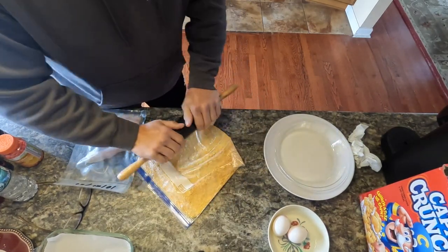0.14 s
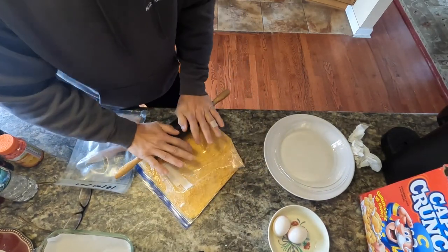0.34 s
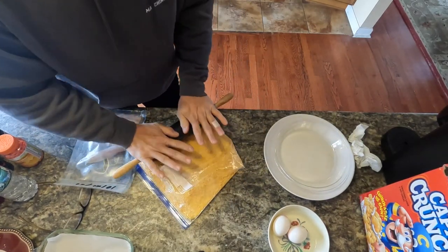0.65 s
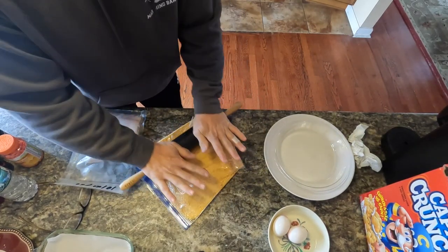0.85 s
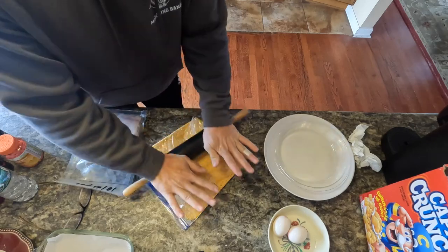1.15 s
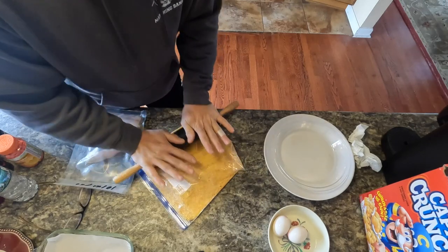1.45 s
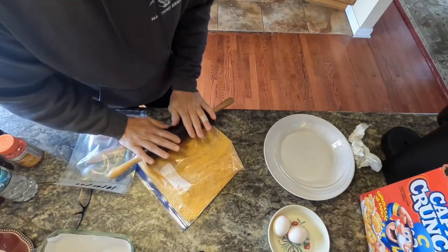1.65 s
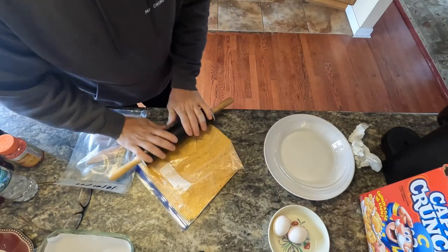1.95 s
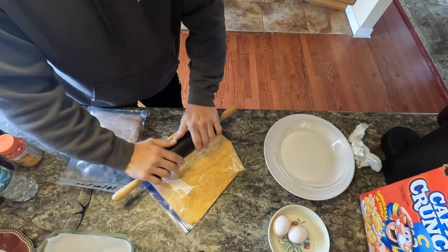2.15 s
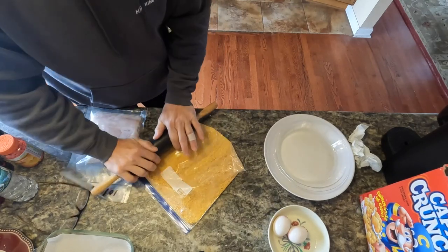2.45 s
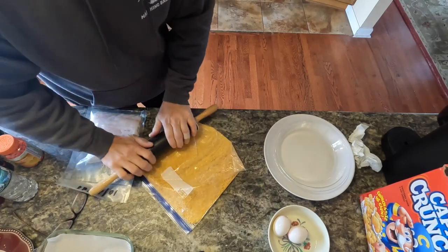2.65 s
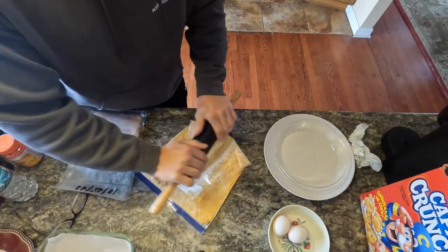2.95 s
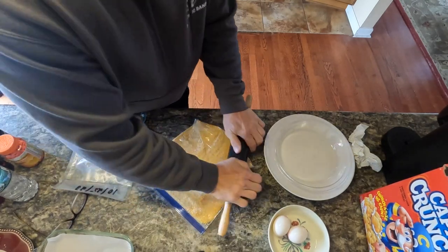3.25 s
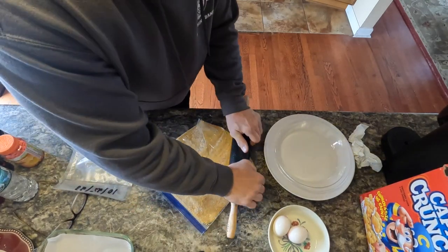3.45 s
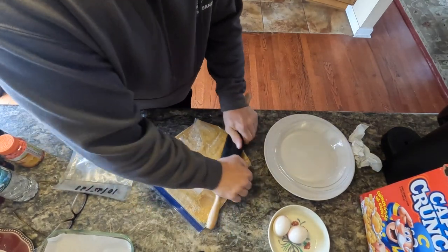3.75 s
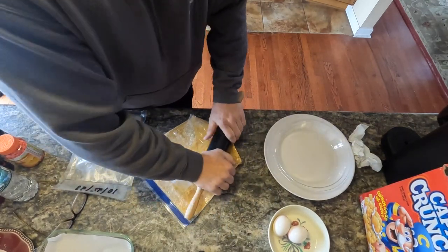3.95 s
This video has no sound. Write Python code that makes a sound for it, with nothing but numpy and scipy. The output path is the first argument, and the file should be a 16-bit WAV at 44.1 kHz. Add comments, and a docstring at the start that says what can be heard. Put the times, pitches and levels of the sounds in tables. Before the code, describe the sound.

In a quiet kitchen, a wooden rolling pin lands with a crunching thud on a plastic bag of dry cereal, then grinds it in quick short shoves. Crumbs crack, the stone counter rumbles and the bag faintly crinkles. After a lull the pin clacks down again, rolls briefly, then knocks down hardest and makes a few duller, softer rolls. Close microphone, slight room reflections.

```python
"""A rolling pin is pushed in short shoves over a plastic bag of cereal on a stone kitchen counter.
Each shove swells noise-like trains of fractures, bumps and folds: crumbs crack, counter rumbles, bag crinkles.
Three times it is set down: a swell of fractures with pin ring and boom, plus thuds and clacks of struck modes.
Light bag crackles and one axle creak are short bursts of filtered grains.
Beneath lie the cabinet's shudder and the low hush of the kitchen, both coloured noise."""
import sys
import numpy as np
from scipy import signal
from scipy.fft import rfft, irfft
from scipy.io import wavfile
from scipy.ndimage import uniform_filter1d

SR = 44100
rng = np.random.default_rng(int(sys.argv[2]) if len(sys.argv) > 2 else 0)


def int16_out(signal):
    """Quantize to a 16-bit WAV file."""
    q = np.round(np.clip(np.atleast_2d(signal).T, -1, 1) * 32767)
    wavfile.write(sys.argv[1], SR, q.astype(np.int16))


N = 180369
TIME = np.arange(N) / SR

# forward shoves of the hands, levels before the mix:
# [full pressure t/s, hold/s, crumbs level/dB, rumble level/dB, bag level/dB]
SHOVES = [(0.0, 0.071, -46.5, -41.5, -63.5), (0.493, 0.077, -25.5, -20.5, -45),
          (0.663, 0.046, -28.5, -26.0, -48.5), (0.826, 0.038, -24, -24.5, -43.5),
          (0.978, 0.051, -28, -24.0, -46.5), (1.151, 0.067, -25.0, -23.5, -45),
          (1.332, 0.08, -27.5, -27.5, -47.0), (1.55, 0.028, -27.5, -24.5, -46),
          (1.679, 0.028, -28, -27.5, -48.0), (1.829, 0.0093, -29, -26, -44),
          (1.96, 0.042, -33.5, -32.0, -51.5), (2.106, 0.047, -33.0, -31, -48),
          (2.53, 0.075, -27.5, -27.5, -45), (2.701, 0.0057, -30.5, -29.0, -47.5),
          (2.813, 0.024, -31, -32, -44.5), (3.297, 0.058, -27.5, -24.5, -52),
          (3.426, 0.026, -43, -31.5, -51), (3.561, 0.11, -36, -28, -54), (3.778, 0.0044, -37.5, -28, -51.5),
          (3.904, 0.0058, -34, -26.5, -53.5), (4.03, 0.049, -50.0, -40, -68.0)]
PRESS_S, RELEASE_T60_S = 0.081, 0.41
RUMBLE_EXPONENT, BAG_EXPONENT = 1.49, 1.13   # powers of the pressure


def shove_gains():
    """Crumb, rumble and bag gains follow hand pressure; overlapping shoves add in power."""
    power = np.zeros((3, N))
    for s, hold_s, crumbs_db, rumble_db, bag_db in SHOVES:
        pressure = stroke(s, hold_s, PRESS_S, RELEASE_T60_S)
        crush = from_db(crumbs_db) * pressure
        jolt = from_db(rumble_db) * pressure ** RUMBLE_EXPONENT
        crease = from_db(bag_db) * pressure ** BAG_EXPONENT
        power += np.square([crush, jolt, crease])
    return np.sqrt(power)


# crumb spectra on the heap and at its thin edge: [f/Hz, relative level/dB]
HEAP_CRUMBS = [(150, -30.5), (290, 6), (395, -18), (540, 2), (760, -2.5), (950, -4), (1100, 1),
               (1600, -1.5), (2000, -3), (2900, -5), (4200, -15), (6000, -21), (8000, -60), (16000, -54)]
EDGE_CRUMBS = [(150, -12.5), (320, 10), (420, 4.5), (620, 4), (750, 8.5), (960, -2.5), (1220, 5.5),
               (1750, 0.5), (2900, -3.5), (4200, -11), (6000, -17), (8000, -42), (16000, -61)]
# counter rumble spectra, heap and edge: [f/Hz, relative level/dB]
HEAP_RUMBLE = [(45, -42), (82, -8), (100, -22), (116, -9), (138, 0.5), (166, 4), (190, -8.5), (222, -3),
               (256, -1.5), (320, -27), (600, -30.5), (2000, -68)]
EDGE_RUMBLE = [(45, -40), (85, -21), (125, -10.5), (160, 7), (190, -6.5), (218, 1), (255, -4.5), (310, -21),
               (600, -41), (2000, -85)]
# bag crinkle spectrum: [f/Hz, relative level/dB]
BAG = [(1000, -27.5), (3000, 16.5), (5500, 9.5), (8200, 7.5), (9500, 2), (10900, -3), (11800, 2.5),
       (13200, -2.5), (14500, -9), (16000, -22)]
# higher modes of the stone slab, also rung by the landings: [f/Hz, relative level/dB, t60/s]
SLAB = [(367.8, 1.5, 0.1), (433.2, 0.5, 0.17), (464.5, 5.5, 0.11), (509.3, -5, 0.18), (594.3, -2, 0.19),
        (691, -11, 0.47), (863, 0.5, 0.097), (1249, -9, 0.32), (1410, 5, 0.026)]
TURN_S = 3.1   # pin swung round to the thin edge of the heap


def rolling(crush, jolt, crease, echo):
    """Harder pushes crack more crumbs; the pin jolts over them into the counter and creases the bag."""
    turned = TIME > TURN_S
    fractures = grains(1500 + 5000 * np.sqrt(crush / crush.max()), spread_db=2.0)
    bumps = grains(900, spread_db=2.0)[0]

    slab = steady(ring(grains(2500, spread_db=4.5)[0], SLAB), span_s=0.075)
    on_heap = steady(colour(fractures, HEAP_CRUMBS), span_s=0.33) + from_db(-1) * slab
    on_edge = from_db(1.5) * steady(colour(fractures, EDGE_CRUMBS), span_s=0.037)
    crumbs = crush * np.where(turned, on_edge, on_heap)

    counter = np.where(turned, colour(bumps, EDGE_RUMBLE), colour(bumps, HEAP_RUMBLE))
    rumble = jolt * steady(counter, span_s=0.26)

    # slack plastic at the edge rustles duller than taut plastic over the heap
    folds = grains(7000, spread_db=-0.5)
    slack = colour(folds, BAG, tilt_db=-1.5)
    taut = colour(folds, BAG, tilt_db=-0.14)
    bag = crease * steady(np.where(turned, slack, taut), span_s=0.07)

    airborne = from_db(-4.0) * crumbs + from_db(4.0) * bag
    return in_room(airborne, echo, wet_db=-16.5) + from_db(-2.5) * rumble


# pin sinking into the heap; ring level is relative to the crunch, tilt acts above 1 kHz:
# [peak pressure t/s, crunch level/dB, rise/s, t60/s, tilt/(dB/octave), pin ring level/dB,
#  barrel click level/dB, boom level/dB, boom f/Hz]
LANDINGS = [(0.341, -17, 0.0076, 0.22, -1.5, -32, -50, -14.5, 44.8),
            (0.366, -15.5, 0.0014, 0.2, -5, -43, -60, -16.5, 100.5),
            (2.456, -25, 0.0087, 0.17, 1.5, -23, -29, -20, 54),
            (2.472, -23, 0.0077, 0.21, -3, -8.5, -23.5, -16, 100),
            (3.218, -16, 0.0079, 0.21, -5, -10.5, -32, -24, 39.6),
            (3.289, -30, 0.011, 0.81, -18, -15, -46, -24.5, 138)]
# spectrum of fractures in the heap: [f/Hz, relative level/dB]
HEAP = [(20, -16), (42, -26), (80, 3), (150, 1.5), (290, 5), (450, -1.5), (780, -8), (1400, -6.5),
        (2700, -1), (4300, -8.5), (6000, -10.5), (8000, -21.5), (12000, -27.5), (16000, -46)]
# higher modes of the pin: [f/Hz, relative level/dB, t60/s]
PIN = [(1120, -7, 0.085), (2160, -6, 0.087), (3150, 7, 0.12), (3030, 0, 0.065), (3500, -34, .09),
       (4000, 13, 0.038), (4140, 12, 0.046), (4400, -23, 0.032), (4880, -10, 0.14)]
# main ring of the barrel: [f/Hz, relative level/dB, t60/s]
BARREL = [(2214, 6.5, 0.16)]
RING_LAG_S, BOOM_RISE_S, BOOM_T60_S = 0.0063, 0.0043, 0.35


def landings(echo):
    """A swell of fractures as the pin flattens the heap; pin and slab ring, the cabinet booms."""
    crunch, barrel, boom = 0, 0, 0
    singing = steady(ring(grains(2000, spread_db=0.0)[0], PIN), span_s=0.02)
    slab = from_db(-8.5) * steady(ring(grains(2000, spread_db=10.5)[0], SLAB), span_s=0.18)
    for s, db, rise_s, t60_s, tilt_db, ring_db, barrel_db, boom_db, boom_hz in LANDINGS:
        fractures = steady(colour(grains(7000, spread_db=1.0), HEAP, tilt_db), span_s=0.033)
        ringing = slab + from_db(ring_db) * singing
        cracking = swell(s, rise_s, t60_s) * fractures
        late_ring = swell(s + RING_LAG_S, rise_s, t60_s) * ringing
        crunch = crunch + from_db(db) * (cracking + late_ring)
        barrel = barrel + ring(blows([s], [barrel_db]), BARREL)
        tone = np.sin(2 * np.pi * boom_hz * (TIME - s))
        boom = boom + from_db(boom_db) * swell(s, BOOM_RISE_S, BOOM_T60_S) * tone
    return in_room(crunch, echo, wet_db=-8.5) + barrel + boom


def clack(s, db, hz, cycles):
    """A hard contact rings one mode that falls 60 dB in a few cycles."""
    return ring(blows([s], [db]), [(hz, 0, cycles / hz)])


# pin meeting the counter, levels of the exciting clicks:
# [t/s, thud level/dB, clack level/dB, clack f/Hz]
KNOCKS = [(0.3428, -8, -17, 2600), (0.3573, -22, -8.5, 776), (0.388, -19, -9.5, 590),
          (0.416, -18, -65, 413), (1.136, -24.5, -30, 400), (1.346, -23.5, -28, 440),
          (1.559, -22, -27, 333), (2.4552, -11.5, -8.5, 1270), (2.464, -15, -6, 1800),
          (2.4698, -12, -15, 506), (2.512, -22, -15, 440), (2.686, -27, -40, 420), (2.777, -31, -44, 453),
          (3.2191, -8.5, 0, 1075), (3.2238, -12.5, -7, 645), (3.236, -14.5, -15, 850),
          (3.266, -11.5, -19, 824), (3.295, -19, -12, 566), (3.312, -26, -25, 1090), (3.576, -30, -29, 286),
          (3.659, -29.5, -28, 266), (3.888, -30, -25.5, 330)]
# low modes of the counter on its cabinet: [f/Hz, relative level/dB, t60/s]
COUNTER = [(155, -3.5, 0.16), (160.6, -4.5, 0.15), (217.4, -8, 0.12), (258, -28, 0.13)]


def knocks(echo):
    """Each blow thuds in the counter modes and clacks at the contact."""
    s, thud_db, _, _ = np.transpose(KNOCKS)
    modes = ring(blows(s, thud_db), COUNTER)
    # the counter radiates little below its lowest mode
    thuds = filtered(modes, 2, 95, "high")
    clacks = sum(clack(at, db, hz, cycles=13.1) for at, _, db, hz in KNOCKS)
    return thuds + in_room(clacks, echo, wet_db=-4.5)


# light crackles of the bag: [t/s, level/dB, f/Hz, t60/s]
TICKS = [(0.3015, -34.5, 1800, 0.03), (0.3, -41.5, 4100, 0.11), (2.3075, -44.5, 2380, 0.021),
         (2.428, -40, 1200, 0.06), (2.439, -35, 1160, 0.095), (3.104, -43, 2700, 0.027),
         (3.103, -62, 7000, 0.08), (3.153, -54, 3300, 0.06), (3.191, -39, 1200, 0.089)]


def bag_ticks(echo):
    """Creasing plastic: short bursts of grains, each through one damped resonance."""
    creases = filtered(grains(5000, spread_db=3.0)[0], 2, 6500)
    ticks = 0
    for s, db, hz, t60_s in TICKS:
        crackle = steady(ring(creases, [(hz, 0, 7.3 / hz)]), span_s=0.0066)
        ticks = ticks + from_db(db) * swell(s, 0.00082, t60_s) * crackle
    return in_room(ticks, echo, wet_db=-1.5)


# axle resonances: [f/Hz, relative level/dB, t60/s]
AXLE = [(1040, -15, 0.043), (1570, 2, 0.032), (1720, -6, 0.022), (2030, -2, 0.028), (2270, 6.5, 0.036),
        (3680, -9, .025), (4140, -11, .04)]
CREAK_AT_S, CREAK_HOLD_S, CREAK_DB = 0.2465, 0.046, -47
CREAK_ATTACK_S, CREAK_T60_S = 0.011, 0.065


def axle_creak():
    """The lifted pin spins; fine slips ring the axle resonances."""
    slips = filtered(grains(2500, spread_db=2.5)[0], 2, 3200)
    envelope = stroke(CREAK_AT_S, CREAK_HOLD_S, CREAK_ATTACK_S, CREAK_T60_S)
    return from_db(CREAK_DB) * envelope * steady(ring(slips, AXLE), span_s=0.012)


# spectrum of the cabinet's shudder: [f/Hz, relative level/dB]
CABINET = [(10, -37), (22, 4), (42, 3), (60, 1), (75, -24), (110, -29), (300, -64)]


def cabinet(jolt):
    """The cabinet shudders beneath the leaning weight, only loosely following each push."""
    shudder = steady(colour(rng.standard_normal(N), CABINET), span_s=0.13)
    return from_db(-42.5) * (jolt / jolt.max()) ** 0.28 * shudder


# spectrum of the kitchen hush: [f/Hz, relative level/dB]
HUSH = [(20, -58), (45, 1.5), (65, 11), (90, -15.5), (140, 1.5), (210, -9.5), (270, -8), (400, -17),
        (700, -72), (2000, -32), (5000, -38), (10000, -59), (16000, -84)]
HUSH_RMS_DB = -49


def kitchen_hush():
    """Steady coloured noise at a fixed RMS level."""
    return from_db(HUSH_RMS_DB) * rms_one(colour(rng.standard_normal(N), HUSH))


# kitchen decay: [f/Hz, t60/s]
KITCHEN = [(250, 0.44), (1000, 0.54), (4000, 0.36), (9000, 0.49), (16000, 0.3)]


def kitchen_echo():
    """Diffuse reflections: noise bands with frequency-dependent decay; unit energy."""
    t = TIME[:SR // 2]
    edges_hz = np.geomspace(220, 16000, 8)
    tail = 0
    for low, high in zip(edges_hz, edges_hz[1:]):
        sos = signal.butter(2, [low, high], "band", fs=SR, output="sos")
        band = signal.sosfilt(sos, rng.standard_normal(len(t)))
        t60_s = at_hz(KITCHEN, np.sqrt(low * high))
        tail = tail + band * from_db(-60 * t / t60_s)
    tail = tail * np.clip(t / 0.0023, 0, 1)
    return tail / np.sqrt(np.sum(tail ** 2))


def in_room(x, echo, wet_db):
    """Direct sound plus reflections, at about unchanged power."""
    x, wet = np.atleast_2d(x), from_db(wet_db)
    reflections = signal.fftconvolve(x, echo[None])[:, :N]
    return (x + wet * reflections) / np.sqrt(1 + wet ** 2)


SPREAD_HZ = 11940   # channels differ only above about this


def grains(per_s, spread_db):
    """Random fractures of exponentially spread dB size; two channels that part in the top treble."""
    sizes = from_db(spread_db * np.minimum(rng.exponential(1, N), 4.5))
    clicks = sizes * rng.choice([-1, 1], N) * (rng.random(N) < per_s / SR)
    highs = filtered(clicks * rng.standard_normal(N), 12, SPREAD_HZ, "high")
    return clicks + highs * np.array([[1], [-1]])


CONTACT_HZ = 4180   # the bag cushions every blow above this


def blows(times_s, levels_db):
    """One low-passed click per blow."""
    clicks = np.zeros(N)
    clicks[np.round(np.asarray(times_s) * SR).astype(int)] = from_db(levels_db)
    return filtered(clicks, 2, CONTACT_HZ)


def ring(clicks, modes):
    """Each click sets every mode ringing as a dying sine."""
    out = 0
    for hz, db, t60_s in modes:
        r = from_db(-60 / (t60_s * SR))   # pole radius
        w = 2 * np.pi * hz / SR
        mode = signal.lfilter([0, np.sin(w)], [1, -2 * r * np.cos(w), r * r], clicks + 1e-18)
        out = out + from_db(db) * mode
    return out


def swell(s, rise_s, t60_s):
    """An envelope that grows exponentially to 1 at time s, then dies away."""
    rise = np.exp(np.minimum(TIME - s, 0) / rise_s)
    return rise * from_db(-60 * np.maximum(TIME - s, 0) / t60_s)


def stroke(s, hold_s, attack_s, t60_s):
    """An envelope that climbs linearly to 1 at time s, is held, then dies away."""
    climb = np.clip(1 + (TIME - s) / attack_s, 0, 1)
    return climb * from_db(-60 * np.maximum(TIME - s - hold_s, 0) / t60_s)


def colour(x, spectrum, tilt_db=0):
    """Causal minimum-phase filter with the given spectrum, tilted in dB/octave above 1 kHz."""
    size = 2 ** 18
    hz = np.maximum(np.arange(size // 2 + 1) * SR / size, 1)
    octaves = np.log2(np.maximum(hz / 1000, 1))
    cepstrum = irfft(np.log(from_db(at_hz(spectrum, hz) + tilt_db * octaves)))
    # folding the cepstrum gives minimum phase
    cepstrum[1:size // 2] *= 2
    cepstrum[size // 2 + 1:] = 0
    return irfft(rfft(x, size) * np.exp(rfft(cepstrum)))[..., :N]


def filtered(x, order, hz, kind="low"):
    """Butterworth filter; the tiny offset keeps denormals away."""
    return signal.sosfilt(signal.butter(order, hz, kind, fs=SR, output="sos"), x + 1e-18)


def at_hz(points, hz):
    """Read a table on a log-frequency axis."""
    knots_hz, values = np.transpose(points)
    return np.interp(np.log(np.maximum(hz, 1)), np.log(knots_hz), values)


def steady(x, span_s):
    """Near unit power over every short span; the fine grain stays."""
    size = int(span_s * SR / 2) + 1
    power = uniform_filter1d(uniform_filter1d(x ** 2, size), size)
    return x / np.sqrt(np.abs(power) + 1e-12)


def rms_one(x):
    """Scale to unit power."""
    return x / np.sqrt(np.mean(x ** 2) + 1e-20)


def from_db(db):
    """Decibels to amplitude gain."""
    return 10 ** (np.asarray(db) / 20)


def scene():
    """All the work on the counter over the low hush of the kitchen."""
    echo = kitchen_echo()
    crush, jolt, crease = shove_gains()
    pin = rolling(crush, jolt, crease, echo) + landings(echo) + knocks(echo)
    handling = bag_ticks(echo) + axle_creak()
    return pin + handling + cabinet(jolt) + kitchen_hush()


CUTOFF_HZ = 15300


def record(dry):
    """High-pass at 12 Hz, round the peaks with tanh, cut the top steeply."""
    thinned = filtered(dry, 1, 12, "high")
    rounded = 1.483 * np.tanh(thinned / 1.548)
    return signal.sosfilt(signal.ellip(10, .1, 90, CUTOFF_HZ, fs=SR, output="sos"), rounded)


dry = scene()
out = record(dry)
int16_out(out)
```